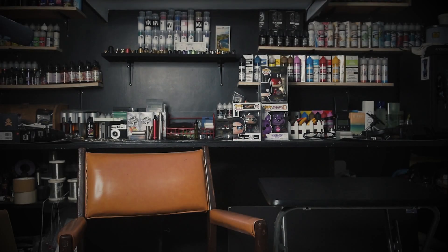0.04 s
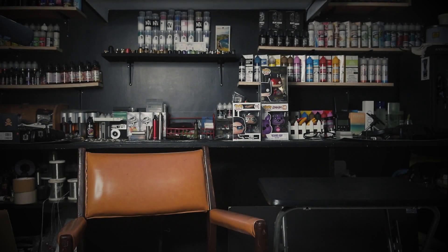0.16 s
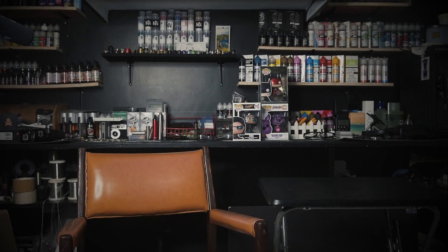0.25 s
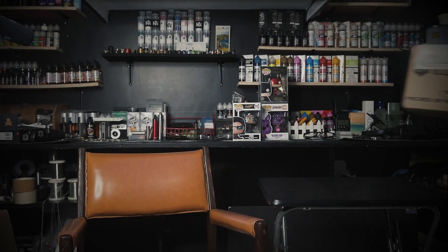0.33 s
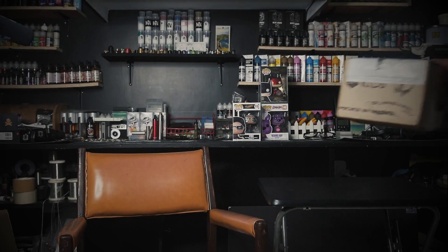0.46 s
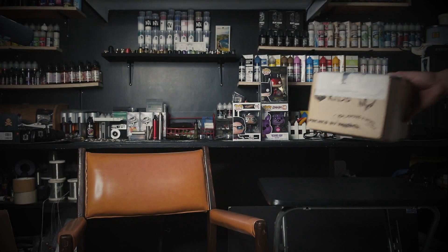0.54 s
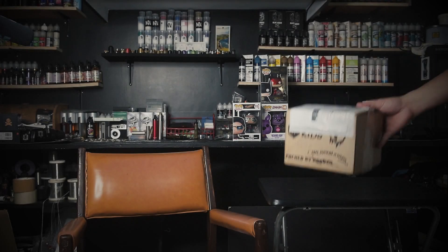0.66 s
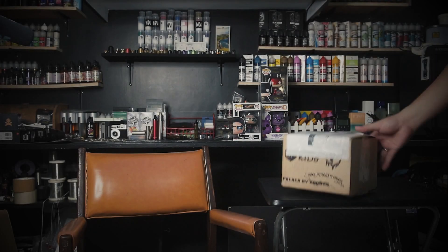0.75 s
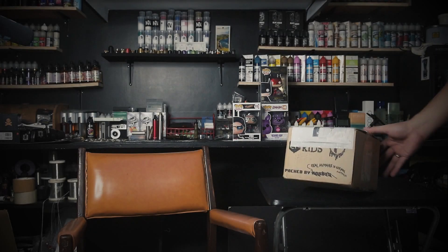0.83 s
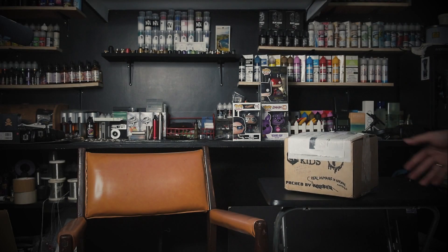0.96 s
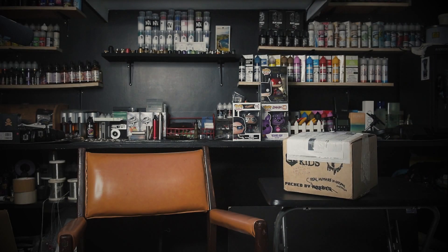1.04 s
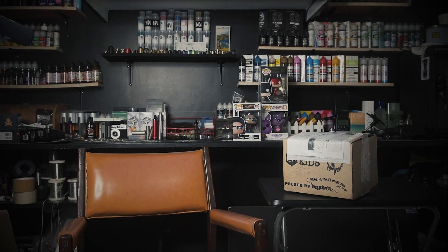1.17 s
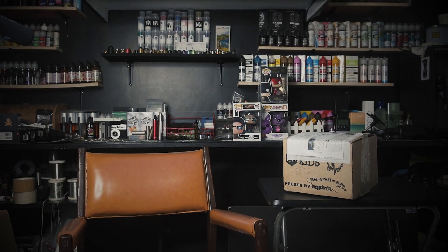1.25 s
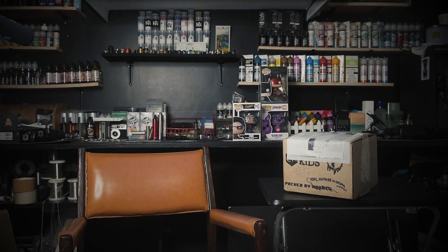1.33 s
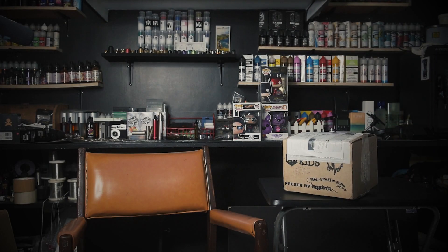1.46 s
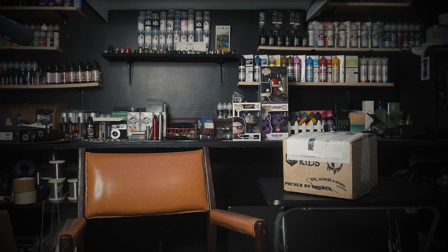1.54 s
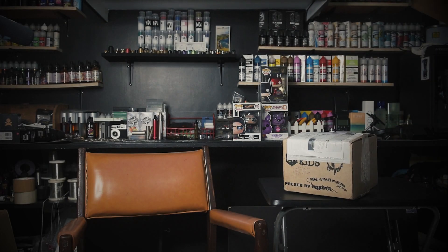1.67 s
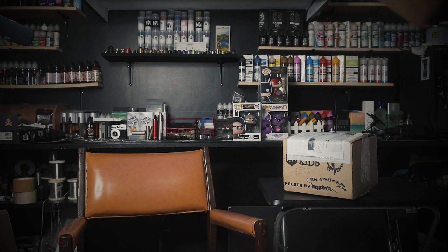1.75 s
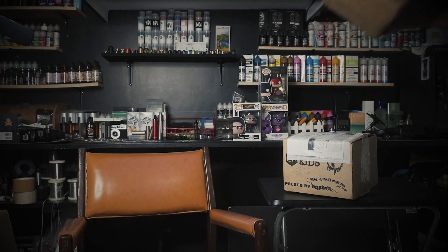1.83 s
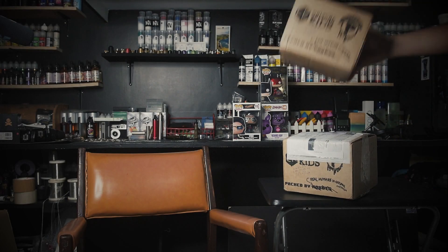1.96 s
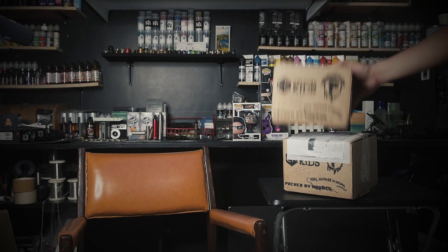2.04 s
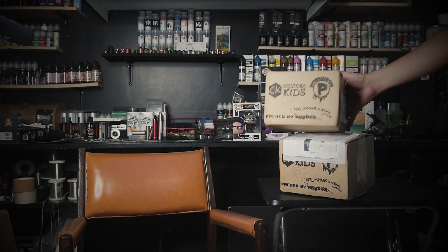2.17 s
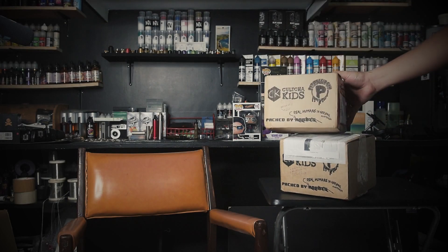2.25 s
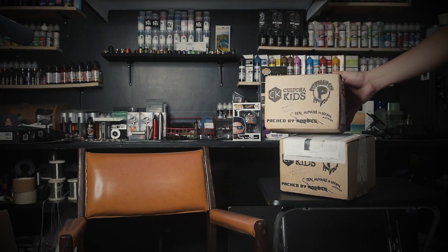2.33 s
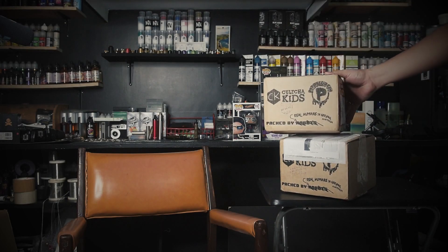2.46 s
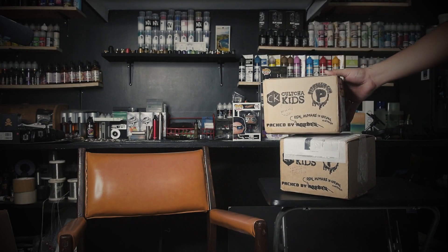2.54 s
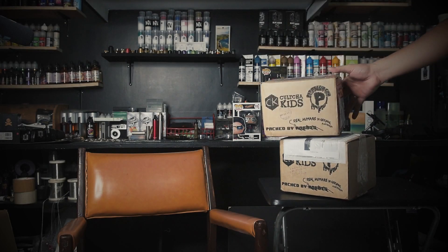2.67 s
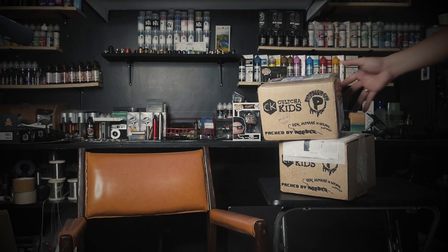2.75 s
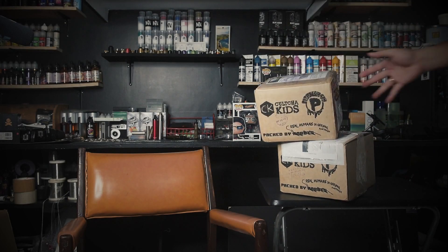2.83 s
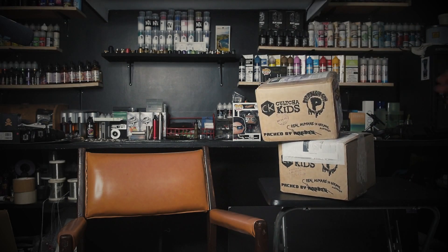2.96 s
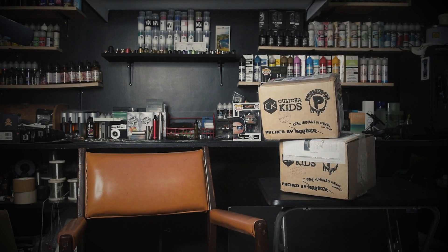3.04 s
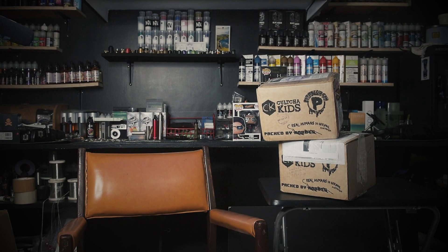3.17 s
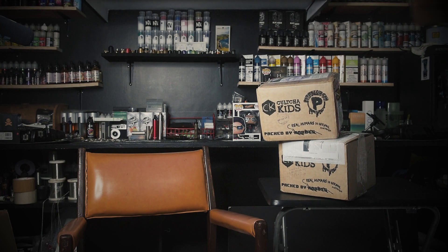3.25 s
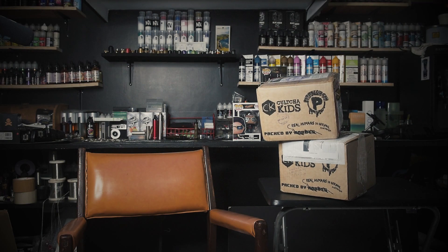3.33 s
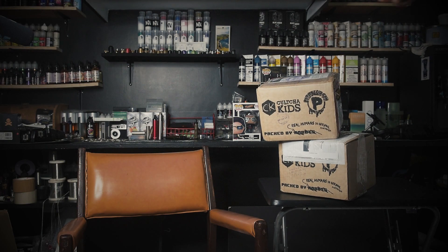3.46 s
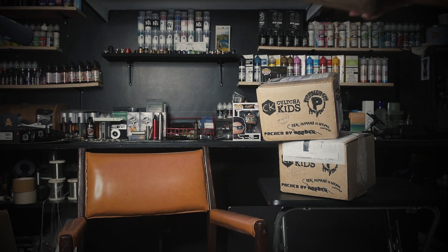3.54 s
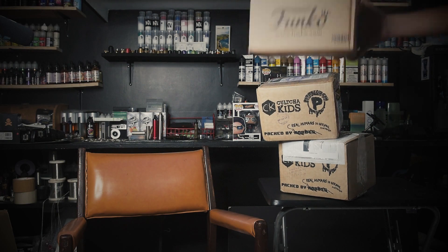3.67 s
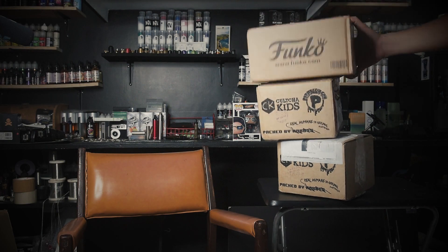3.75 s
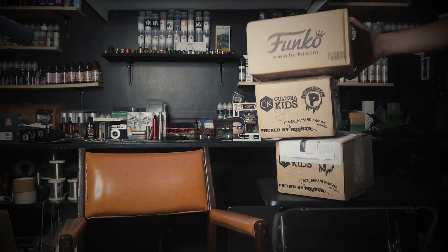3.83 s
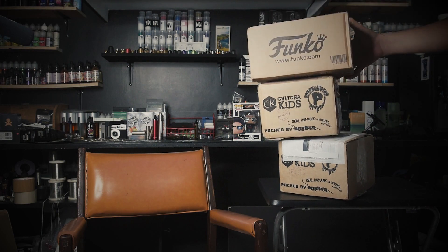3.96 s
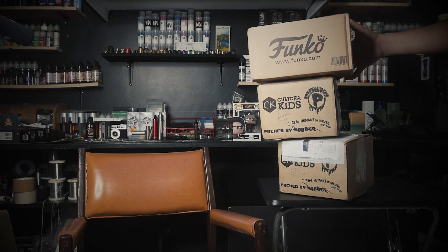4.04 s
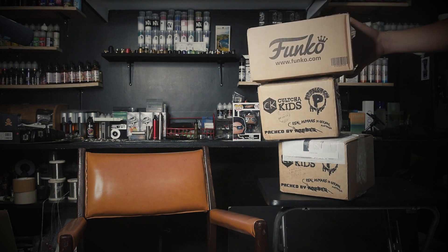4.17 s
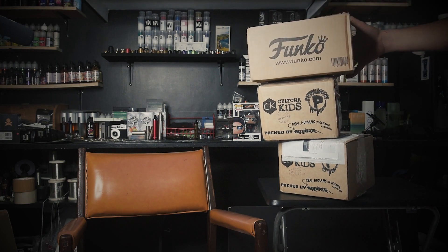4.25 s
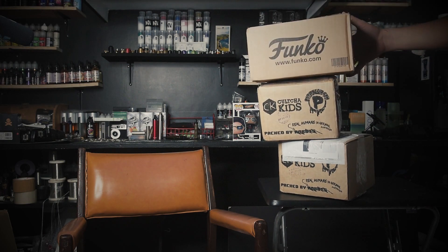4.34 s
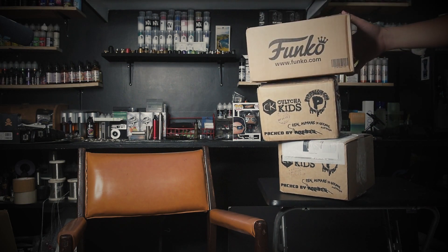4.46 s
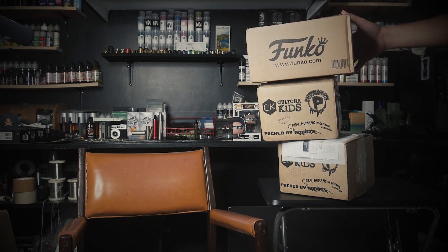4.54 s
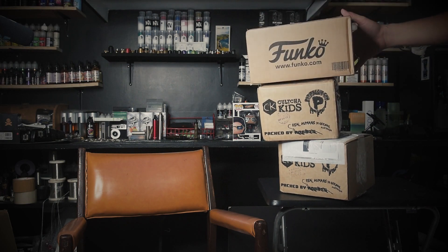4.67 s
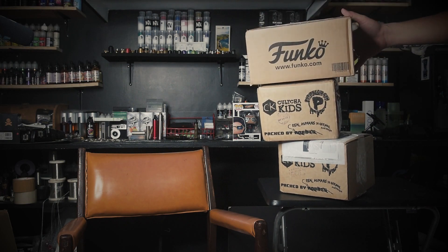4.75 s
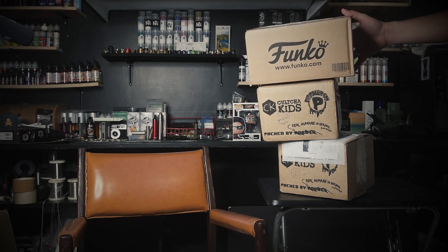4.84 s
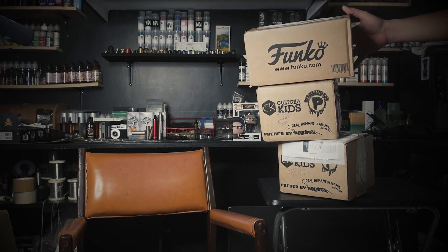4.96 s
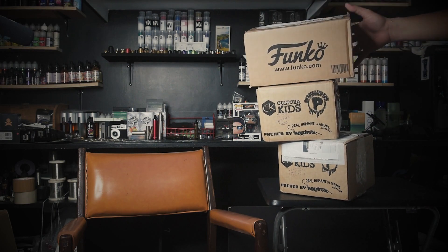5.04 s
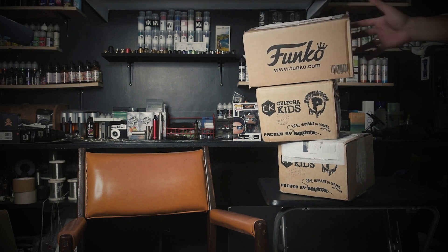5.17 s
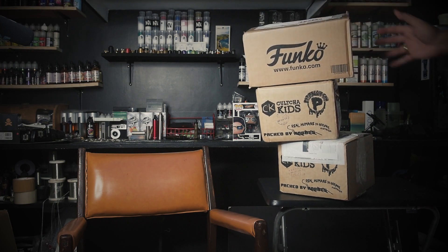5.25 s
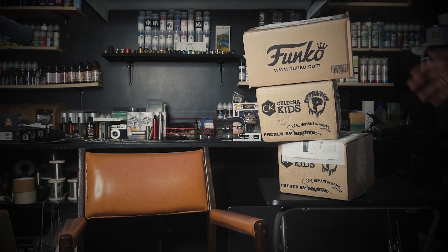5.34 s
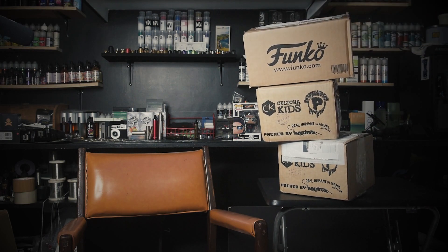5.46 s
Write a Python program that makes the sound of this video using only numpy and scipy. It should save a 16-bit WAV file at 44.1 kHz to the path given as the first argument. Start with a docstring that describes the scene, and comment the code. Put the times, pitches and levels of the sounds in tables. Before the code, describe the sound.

A quiet small room with a faint, steady low hum of a compressor motor and mains, slightly beating, under a soft dull rush of air. Light sleeve and hand rustle and a small tick come in the first half second. At about 0.95 s a cardboard box lands flat: a double slap merging into one firm hollow thud, the loudest, with small low bumps until 1.05 s. Soft scuffs and knocks of fingers follow from 1.1 to 1.75 s. At 2.28 s a second box lands on the first, duller, with crisp scratches and little rocking taps until about 2.45 s. Faint ticks and rubbing continue, with gentle strokes near 3.0 and 3.6 s. At 3.92 s the third box lands with a clean, resonant, brighter knock and settles quickly; tiny clicks follow to 4.2 s. Then only hum and air remain to the end, about 5.5 s. Short room echo, close microphone, nearly centred.

```python
"""In a small cluttered room, three cardboard boxes are dropped one on another.
Each lands flat with a thud, rocks and settles: every touch is a slap, a ring of the box and a scratch.
Hands and cardboard rustle and tick between, made of shaped noise and short noise bursts.
A compressor motor and the mains hum as steady tones, over a soft rush of air made of filtered noise."""
import sys
import numpy as np
from scipy import signal
from scipy.fft import rfft, irfft
from scipy.io import wavfile
from scipy.ndimage import uniform_filter1d

SR = 44100
rng = np.random.default_rng(int(sys.argv[2]) if len(sys.argv) > 2 else 0)


def bounce(signal):
    """Save signal as a 16-bit WAV file at the path given by the first command-line argument."""
    frames = np.transpose(np.atleast_2d(signal))
    limited = np.clip(frames, -1, 1)
    pcm = np.round(limited * 32767).astype(np.int16)
    wavfile.write(sys.argv[1], SR, pcm)


def field_ratio(decibels):
    """Amplitude ratio for a level in dB (20 dB per decade); scalars and array-likes work."""
    return 10 ** (np.asarray(decibels, dtype=float) / 20)


N = 242801   # length of the scene in samples


def rms_one(x):
    """Scale to an average (rms) strength of 1."""
    return x / np.sqrt(np.mean(x ** 2) + 1e-30)


def peak_one(x):
    """Scale so the strongest 130 samples are as strong as a sine wave of height 1."""
    return x / np.sqrt(2 * uniform_filter1d(x ** 2, size=130).max())


def at_hz(points, hz):
    """Read a table between its points, on a log-frequency axis."""
    table_hz, value = np.transpose(points)
    return np.interp(np.log(hz), np.log(table_hz), value)


def band(x, low_hz, high_hz):
    """Keep what lies between two frequencies."""
    return signal.sosfilt(signal.butter(2, [low_hz, high_hz], "band", fs=SR, output="sos"), x)


def low_pass(x, cut_hz):
    """Steeply weaken everything above a frequency."""
    return signal.sosfilt(signal.butter(8, cut_hz, fs=SR, output="sos"), x)


def add(out, start_s, x):
    """Mix x into out from start_s on."""
    i = round(start_s * SR)
    out[i:i + len(x)] += x[:N - i]


# limits of the third-octave bands: freq_hz
EDGES = 30 * 2 ** np.arange(0, 9.1, 1 / 3)


def banded_noise(spectrum, side_table, length, t60_table=None):
    """Noise in third-octave bands, as mid and side; with a t60 table each band dies away at its own rate."""
    out = 0
    white = rng.standard_normal((2, 2, length))
    t = np.arange(length) / SR
    for k, (low, high) in enumerate(zip(EDGES, EDGES[1:])):
        hz = np.sqrt(low * high)
        fade = field_ratio(-60 * t / at_hz(t60_table, hz)) if t60_table else 1
        x = fade * band(white[k % 2], low, high)   # neighbouring bands use different noise
        # a wider band holds more energy, and so does a slower decay
        x = x * np.sqrt(hz * np.mean(fade ** 2) / np.mean(x ** 2, axis=1, keepdims=True))
        side_gain = field_ratio([[0], [at_hz(side_table, hz)]])
        out = out + field_ratio(at_hz(spectrum, hz)) * x * side_gain
    return out / np.sqrt(np.mean(out[0] ** 2))


def burst(decay_ms, length):
    """Scratchy noise that swells fast and dies away, evened so that no pitch stands out."""
    t = np.arange(length) / (decay_ms * SR / 1000)
    shape = (1 - np.exp(-6.0 * t)) * np.exp(-t)
    x = rng.standard_normal(length) * shape
    for _ in range(4):   # flatten the spectrum and restore the shape in turn
        spectrum = rfft(x)
        x = irfft(spectrum / (np.abs(spectrum) + 1e-30), length)
        x = x * shape / np.sqrt(np.abs(uniform_filter1d(x ** 2, size=31)) + 1e-12)
    return x


# colour of the rush of air: freq_hz, level_db (per Hz, relative)
AIR_COLOUR = [(30, -34), (75, -16.5), (118, -24), (165, -10), (230, -3.5), (300, -4), (500, -3),
              (920, -6.5), (1500, -9.5), (1800, -18), (2300, -17), (3500, -24.5), (5000, -30.5),
              (7000, -35.5), (9000, -55)]
# how wide the air sounds, used for the rustle too: freq_hz, side_minus_mid_db
AIR_WIDTH = [(60, -11), (200, -21), (650, -17.5), (1200, -21.5), (2200, -11.5), (4000, -12), (7000, -3.5)]


def air():
    """A soft steady rush of noise, low-passed so that its treble is missing here."""
    level_db, low_pass_hz = -64, 6680
    return field_ratio(level_db) * low_pass(banded_noise(AIR_COLOUR, AIR_WIDTH, N), low_pass_hz)


# tones of the mains: multiple of the mains frequency, level_db (rms)
MAINS_TONES = [(1, -68.5), (3, -65.5), (4, -85.5), (5, -70), (7, -76.5), (9, -74), (11, -79), (13, -87.5)]
# tones of the motor: multiple of the shaft frequency, level_db (rms)
SHAFT_TONES = [(4, -80.5), (5, -66), (12, -80.5), (13, -77.5), (14, -80), (15, -74.5), (16, -74.5),
               (18, -81), (19, -85), (20, -93), (21, -79.5), (23, -78), (24, -82), (25, -83), (27, -78.5),
               (38, -85.5), (45, -88)]
# how far the hum on the left is ahead of the right: freq_hz, lead_radians
HUM_LEFT_LEAD = [(60, 0.17), (180, 0.084), (500, 0.13), (2000, 0.27)]


def hum():
    """Multiples of the mains and of the motor shaft, which slips a little behind the mains."""
    mains_hz, shaft_hz = 60.15, 58.35
    slip_tone_hz, slip_tone_db = 298.85, -71.5
    in_step_s = 1.655   # the three tones near 300 Hz crest together here and beat apart
    tones = [(k * mains_hz, db) for k, db in MAINS_TONES]
    tones += [(k * shaft_hz, db) for k, db in SHAFT_TONES]
    tones += [(slip_tone_hz, slip_tone_db)]
    out, t = 0, np.arange(N) / SR - in_step_s
    for hz, level_db in tones:
        # tones away from 300 Hz start anywhere in their cycle
        start = rng.uniform(0, 2 * np.pi) * (abs(hz - slip_tone_hz) > 10)
        phase = 2 * np.pi * hz * t + start
        mid = np.cos(phase)
        side = -np.tan(at_hz(HUM_LEFT_LEAD, hz) / 2) * np.sin(phase)
        out = out + np.sqrt(2) * field_ratio(level_db) * np.array([mid, side])
    return out


# what the walls give back: freq_hz, level_db (per Hz, relative)
ROOM_COLOUR = [(60, 10), (200, -4), (600, -2), (1500, 1.5), (4000, -1), (9000, -3.5), (14000, 7.5)]
# how wide the echo sounds: freq_hz, side_minus_mid_db
ROOM_WIDTH = [(60, -5), (110, -21), (220, -44), (600, -29), (1200, -25), (2200, -20.5), (7000, -17),
              (13000, 0)]
# time in which the echo fades by 60 dB, before the early wash is added: freq_hz, fade_s
ROOM_FADE = [(100, 0.41), (260, 0.56), (700, 0.42), (1840, 0.53), (4850, 0.56), (8000, 0.57), (11500, 0.15)]


def room(x):
    """Dense reflections that die band by band, as mid and side."""
    level_db, delay_s, length = -8, 0.0037, 26000   # length in samples
    early_db, early_ms = 5, 19.4   # near shelves and table send back a stronger first wash
    echo = banded_noise(ROOM_COLOUR, ROOM_WIDTH, length, ROOM_FADE) / np.sqrt(length)
    early = field_ratio(early_db) * np.exp(-np.arange(length) / (early_ms * SR / 1000))
    echo = echo * (1 + early)
    echo = np.pad(echo, ((0, 0), (round(delay_s * SR), 0)))
    return field_ratio(level_db) * signal.fftconvolve(x[None], echo, axes=1)[:, :N]


FAINT_LOW_PASS_HZ = 6970   # the faint rustle and ticks are heard here without treble above this

# colour of the rubbing: freq_hz, level_db (per Hz, relative)
RUSTLE_COLOUR = [(500, -8), (1200, 9), (2200, 16), (3500, 9), (5500, -2), (7500, -26)]
# strokes of sleeve and hands on cardboard: crest_s, level_db, fade_db_per_s (to either side)
RUB_STROKES = [(.39, -67.5, 100), (.92, -71, 177), (1.13, -70, 400), (1.32, -66.5, 150), (1.62, -65.5, 127),
               (1.73, -73.5, 300), (2.03, -89, 200), (2.22, -81, 80), (2.66, -83, 60), (3.04, -69.5, 192),
               (3.24, -80, 100), (3.59, -65.5, 152), (4.03, -74, 202), (4.3, -92, 130)]


def rustle():
    """Dense fine grains of rubbing, swelling and fading with each stroke."""
    t = np.arange(N) / SR
    wander_per_s = 38   # random loudness points per second
    knots = rng.standard_normal(int(N / SR * 40))
    wander = np.interp(t * wander_per_s, np.arange(len(knots)), knots)
    grains = field_ratio(2 * wander + 2 * rng.exponential(1, N))   # dB of wander and of fine grain
    level = sum(field_ratio(db - fade * np.abs(t - crest_s)) for crest_s, db, fade in RUB_STROKES)
    noise = banded_noise(RUSTLE_COLOUR, AIR_WIDTH, N)
    return low_pass(level * noise * rms_one(grains), FAINT_LOW_PASS_HZ)


# knocks, ticks and scuffs of cardboard and fingers: start_s, level_db (peak), centre_hz, decay_ms
SMALL_TICKS = [(0.186, -46.5, 584, 3.5), (0.655, -56, 554, 9.3), (0.853, -49.5, 700, 10.7),
               (0.882, -62.5, 3900, 4.7), (1.126, -51, 2780, 8.1), (1.135, -41.5, 600, 10),
               (1.152, -56, 3200, 0.94), (1.21, -60, 890, 2.3), (1.224, -64, 4200, 1.6),
               (1.264, -63, 2780, 3.1), (1.303, -56, 3300, 3.7), (1.318, -63, 3830, 9.5),
               (1.49, -48, 960, 6.3), (1.533, -53, 860, 15), (1.548, -61, 3400, 2.8),
               (1.715, -49.5, 700, 10), (1.897, -68, 6000, 4.1), (1.91, -53, 870, 4.5),
               (1.988, -63, 3440, 1.7), (2.021, -57.5, 3870, 1.85), (2.289, -36, 4250, 3.5),
               (2.352, -38, 2760, 2.5), (2.491, -53, 2660, 2.6), (2.608, -58.5, 2920, 13),
               (2.879, -63.5, 2300, 4.5), (3.001, -55, 2730, 1.6), (3.037, -63.5, 4370, 1.7),
               (3.225, -61, 4100, 1.1), (3.2425, -54, 4670, 0.76), (3.5559, -51, 1730, 9.1),
               (3.579, -62, 2500, 4.4), (3.878, -65.5, 3260, 3.3), (4.105, -53, 3620, 3.8),
               (4.117, -51.5, 2620, 1.44), (4.139, -47, 300, 8.7), (4.196, -59, 3020, 1.4)]


def ticks():
    """Short scratchy bursts, each in its own band; high ones are narrower in octaves."""
    out = np.zeros(N)
    for start_s, level_db, hz, decay_ms in SMALL_TICKS:
        octaves = 1.25 - 0.21 * np.log2(hz / 1000)   # width of the band
        spread = 2 ** (octaves / 2)
        tick = peak_one(band(burst(decay_ms, 4000), hz / spread, hz * spread))
        add(out, start_s, field_ratio(level_db) * tick)
    return low_pass(out + 1e-18, FAINT_LOW_PASS_HZ)


# colour of flat cardboard on cardboard: freq_hz, level_db (per Hz, relative)
SLAP_COLOUR = [(35, -45), (60, -74), (86, -49), (113, -21), (148, -12), (208, 9.5), (279, -13.5),
               (392, 2.5), (429, 6.5), (969, 1), (1630, -16), (5650, -33.5), (13400, -63.5)]


def slap_colour(x):
    """Colour a sound like flat cardboard, band by band; every other band is turned upside down."""
    out = 0
    for k, (low, high) in enumerate(zip(EDGES, EDGES[1:])):
        gain = field_ratio(at_hz(SLAP_COLOUR, np.sqrt(low * high)))
        out = out + gain * band(x, low, high) * (-1) ** k
    return out


def box_ring(push, modes):
    """Wall and air resonances set off by a push; each touch finds them with other strengths."""
    ring = 0
    for hz, width_hz, level_db in modes:
        r = np.exp(-np.pi * max(width_hz, 20) / SR)   # a wider resonance dies sooner
        w = 2 * np.pi * hz / SR
        gain = field_ratio(level_db + 2 * rng.normal())
        ring = ring + gain * signal.lfilter([0, np.sin(w)], [1, -2 * r * np.cos(w), r * r], push)
    return ring


def box(touches, modes, flat_top_hz, low_pass_hz, ring_db):
    """Every touch slaps air out, rings the walls of the box and scratches at the edges."""
    slap_db, body_hz = -3.5, 157   # below body_hz a box radiates little
    soft_top_hz = 1400   # all touches but the hardest are dull
    scratch_ms, scratch_grows_ms_per_s = 3.1, 44.5   # later touches drag longer
    out = np.zeros(N)
    push = np.zeros(8000) + 1e-18
    push[0] = -1
    slap = field_ratio(slap_db) * peak_one(slap_colour(push))
    hardest = np.argmax(np.array(touches)[:, 1])
    for n, (start_s, level_db, bass_db, scratch_db) in enumerate(touches):
        ring = field_ratio(ring_db) * peak_one(box_ring(push, modes))
        thud = band(slap + ring, body_hz, flat_top_hz if n == hardest else soft_top_hz)
        bass = band(thud, body_hz, 3500)
        bass = signal.sosfilt(signal.butter(1, 350, fs=SR, output="sos"), bass)
        decay_ms = scratch_ms + scratch_grows_ms_per_s * (start_s - touches[0][0])
        scratch = peak_one(band(slap_colour(burst(decay_ms, 8000)), 1573, 16000))
        touch = thud + (field_ratio(bass_db) - 1) * bass + field_ratio(scratch_db) * scratch
        add(out, start_s, field_ratio(level_db) * touch)
    # little of a blow is heard below 130 Hz
    return low_pass(band(out + 1e-18, 130, 19845), low_pass_hz)


# touches of each box as it lands and rocks:
# start_s, level_db, bass_db (lift or cut of the bass), scratch_db (before level_db)
BOX_TOUCHES = [
    [(0.9517, -22, -1.5, -0.5), (0.9533, -13.5, 4.5, -3.5), (0.9640, -21.5, 1.5, -11), (0.978, -42, 9, 5),
     (1.001, -34.5, 16, 0.5), (1.033, -39.5, 15.5, -15)],
    [(2.2795, -16.5, 3, -11.5), (2.2845, -47, -17, -17), (2.288, -29, -6, 6), (2.299, -31, 3, -10),
     (2.317, -43, -2, -10), (2.332, -35.5, 3, -12), (2.343, -42, 14.5, 8), (2.363, -37.5, 6, 0),
     (2.410, -46.5, -9, 6.5), (2.423, -55, 1, -8)],
    [(3.9236, -17, 2, -3.5), (3.940, -41, -4, -11), (3.958, -46, 1, -10), (4.00, -61, -9, -2)],
]
# wall and air resonances of each box: freq_hz, width_hz, level_db (relative)
BOX_MODES = [
    [(214, 23, -30.5), (335, 52, 10), (347, 150, 30), (527, 28, 21), (670, 18, 4), (895, 130, 29),
     (980, 110, 23), (1310, 84, -16), (2440, 600, -3), (3750, 370, 3)],
    [(196, 25, 15), (329.4, 16.5, 10.5), (477, 240, -19), (576, 190, 22.5), (844, 31, 1), (920, 85, -15),
     (1330, 100, -26), (1900, 390, -2), (2650, 150, 9.5), (4100, 410, -7)],
    [(227, 46, 38), (294, 50, 47.5), (436, 110, 38), (700, 50, 38.5), (1018, 61, 39.5), (1290, 58, 3),
     (2300, 320, -4), (3200, 250, -27), (3850, 250, -16)],
]
# the hardest touch of each box is brighter than the rest: top_hz
HARD_HIT_TOP = [10000, 2980, 13000]
# where the treble heard from each box ends: low_pass_hz
BOX_LOW_PASS = [13500, 10700, 11200]
# strength of the ring of each box: level_db (relative)
BOX_RING = [-2, -3, 1]


def dropped_boxes():
    """Three boxes land in turn, each with its own touches and resonances."""
    each_box = zip(BOX_TOUCHES, BOX_MODES, HARD_HIT_TOP, BOX_LOW_PASS, BOX_RING)
    return sum(box(*settings) for settings in each_box)


def scene():
    """Boxes and ticks in the room, over rustle, air and hum."""
    tick_room_db = -4   # light touches wake the room less than a box that shakes the table
    early_left = 0.5   # samples by which the blows and ticks reach the left side first
    struck_side = -.015   # share of them in the side, a little to the right
    left_db = -.14   # the right side gets the opposite
    small = ticks()
    thuds = dropped_boxes()
    mid, side = room(thuds + field_ratio(tick_room_db) * small) + rustle() + air() + hum()
    struck = thuds + small
    mid = mid + struck
    side = side + early_left / 2 * np.gradient(struck) + struck_side * struck
    return np.array([mid + side, mid - side]) * field_ratio([[left_db], [-left_db]])


def top_cut(x):
    """Nothing passes above the cut-off."""
    return signal.sosfilt(signal.butter(12, 13500, fs=SR, output="sos"), x)


def record(dry):
    """Turn the finished mix into the sound that is written out."""
    return top_cut(dry)


dry = scene()
out = record(dry)
bounce(out)
```